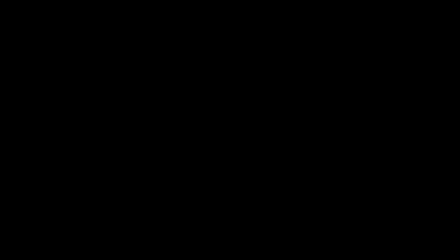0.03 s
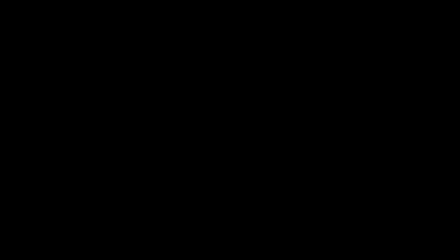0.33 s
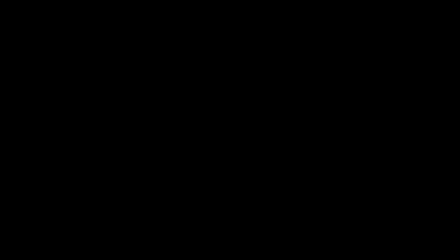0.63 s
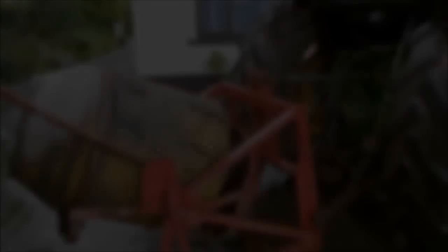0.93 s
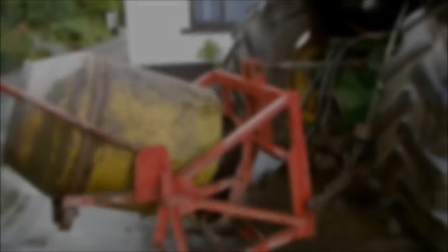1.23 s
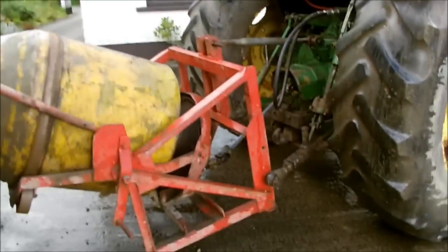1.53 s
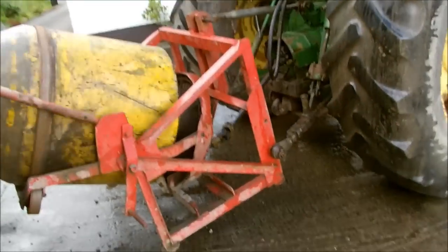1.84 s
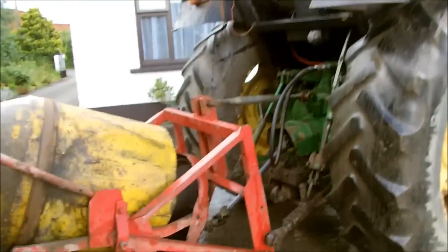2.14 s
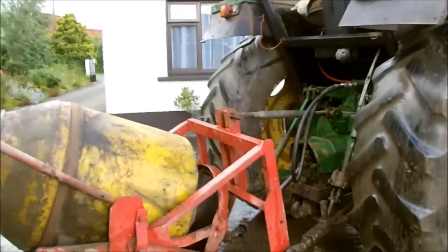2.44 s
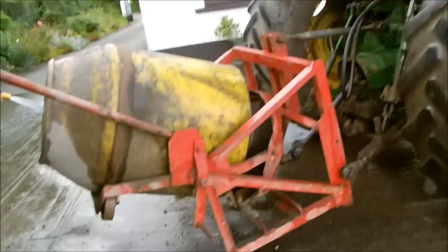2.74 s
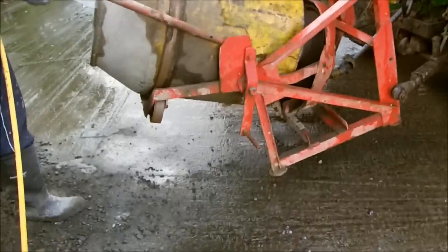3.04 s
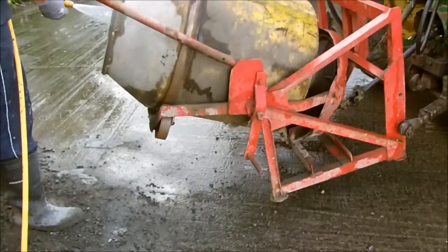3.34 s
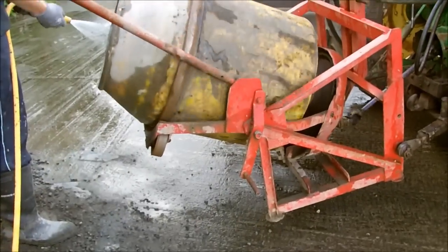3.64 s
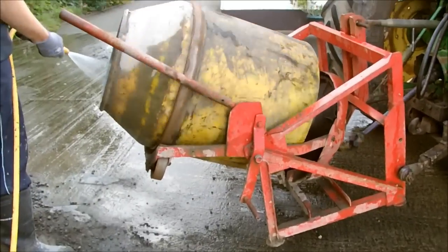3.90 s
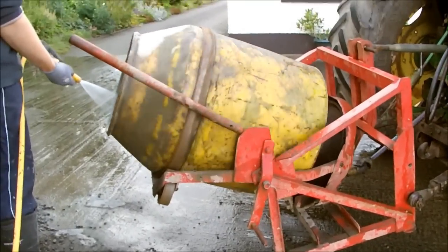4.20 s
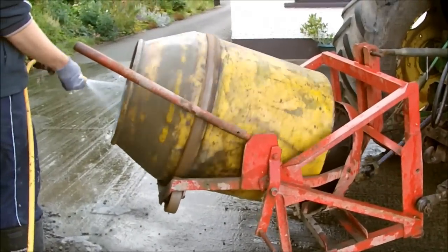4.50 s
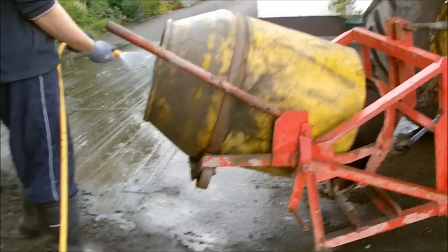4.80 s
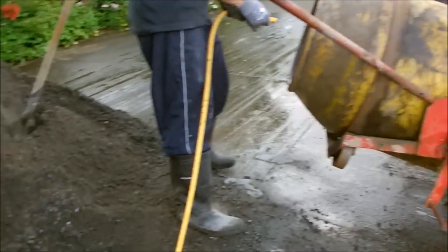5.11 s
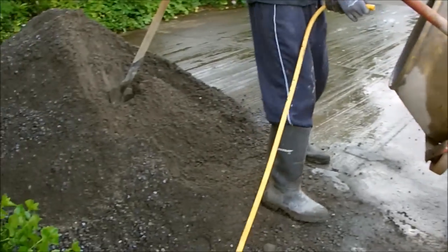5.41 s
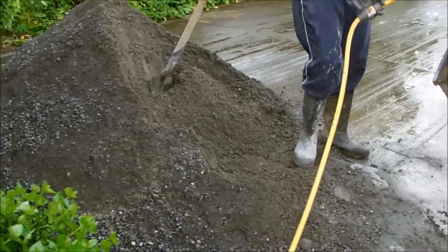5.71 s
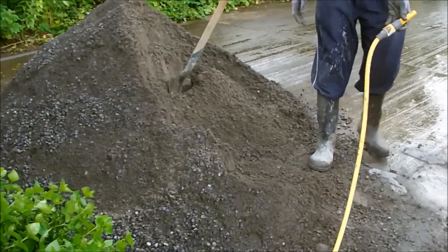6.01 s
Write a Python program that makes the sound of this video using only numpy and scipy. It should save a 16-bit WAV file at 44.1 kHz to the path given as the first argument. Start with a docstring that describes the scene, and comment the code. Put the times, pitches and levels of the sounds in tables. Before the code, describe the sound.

A tractor idles and turns a cement mixer, wet gravel tumbling amid irregular metal knocks and clangs while a hose sprays.

```python
"""A tractor idles and turns a cement mixer on a concrete yard while a hose sprays into the drum.
From the start wet gravel tumbles and booms in the steel shell, the loose drive knocks and a small
part pings. From 0.5 to 3.4 s a steel fitting clangs. After 3 s the listener slowly turns away;
the knocks thin out past 3.6 s and the spray is a little louder. From 5.4 s the knocks crowd in
again and the exhaust throbs harder."""
import sys
import numpy as np
from scipy import signal
from scipy.fft import rfft, irfft
from scipy.io import wavfile
from scipy.ndimage import uniform_filter1d, map_coordinates

SR = 44100
rng = np.random.default_rng(int(sys.argv[2]) if len(sys.argv) > 2 else 0)


def dump(signal):
    """Clip the signal to [-1, 1] and save it as 16-bit WAV at the path in sys.argv[1]."""
    limited = np.clip(np.atleast_2d(signal).T, -1, 1)
    pcm = np.round(limited * 32767).astype(np.int16)
    wavfile.write(sys.argv[1], SR, pcm)


N = 271215
T = np.arange(N) / SR

# lumps of mix dropping on the shell: (time [s], level [dB])
LUMPS = [(.309, -31), (1.43, -22.5), (2.076, -18.5), (2.14, -25), (2.807, -23.5), (3.06, -25), (3.293, -21),
         (3.514, -29), (3.894, -19.5), (4.122, -24), (4.279, -26.5), (4.828, -23.5), (4.904, -21),
         (5.219, -24), (5.692, -23.5), (5.816, -26), (6.058, -20.5)]
# spectrum of sliding gravel and of engine clatter: (frequency [Hz], level [dB])
RATTLE_SPECTRUM = [(100, -50), (400, -16.5), (800, -5.5), (1150, -3.5), (1350, -2.5), (1650, -0.5),
                   (2150, -0.5), (3000, -5.5), (5000, -10.5), (8000, -15), (15000, -28)]


def undb(db):
    """Decibels to gain."""
    return 10 ** (np.asarray(db) / 20)


def unit(x):
    """Scale to rms 1."""
    return x / np.sqrt(np.mean(x ** 2))


def curve(rows):
    """Join (time [s], value) rows by straight lines."""
    return np.interp(T, *np.transpose(rows))


def fade(t, t60_s):
    """Exponential decay, 60 dB in t60_s."""
    return np.exp(-np.log(1000) * t / np.maximum(t60_s, 1e-3))


def add(track, time_s, sound):
    """Mix a sound into a track."""
    i = max(int(time_s * SR), 0)
    track[i:i + len(sound)] += sound[:N - i]


def advance(x, samples):
    """Read a signal a fractional number of samples early."""
    return map_coordinates(x, [np.arange(N) + samples], order=5)


def lowpass(x, hz):
    """Gentle zero-phase low-pass."""
    return signal.sosfiltfilt(signal.butter(2, hz, fs=SR, output="sos"), x)


def colour(x, spectrum):
    """Minimum-phase filter from (frequency [Hz], level [dB]) rows, via the cepstrum."""
    size = 8192
    hz, db = np.transpose(spectrum)
    bins_hz = np.fft.rfftfreq(size, 1 / SR)
    gain = undb(np.interp(np.log(bins_hz + 1), np.log(hz), db))
    cepstrum = irfft(np.log(gain))
    cepstrum[1:size // 2] *= 2
    cepstrum[size // 2 + 1:] = 0
    impulse_response = irfft(np.exp(rfft(cepstrum)))
    return signal.fftconvolve(x, impulse_response)[:len(x)]


def noise(spectrum):
    """Coloured noise, rms 1."""
    return unit(colour(rng.standard_normal(N), spectrum))


def wander(rate_hz):
    """Ramps between random values, rms 1."""
    hold = int(SR / rate_hz)
    steps = np.repeat(rng.standard_normal(N // hold + 1), hold)
    return unit(uniform_filter1d(steps, hold)[:N])


def ring(modes, mode_db=0, scatter_db=3.5):
    """One blow on a set of modes; each contact point excites them differently."""
    hz, db, t60_s = np.transpose(modes)[:, :, None]
    t = T[:SR // 4]
    gain = undb(db + np.reshape(mode_db, (-1, 1)) + scatter_db * rng.standard_normal(hz.shape))
    phase = 2 * np.pi * (hz * t + rng.random(hz.shape))
    return np.sum(gain * fade(t, t60_s) * np.sin(phase), axis=0)


def grains(rate_hz, spread_db, t60_s):
    """Many small unequal impacts, each a noise burst; rms 1."""
    hits = rng.random(N) < rate_hz / SR
    sizes = undb(spread_db * np.minimum(rng.exponential(size=N), 4))
    power = signal.lfilter([1], [1, -fade(2 / SR, t60_s)], hits * sizes ** 2)
    return unit(np.sqrt(power) * rng.standard_normal(N))


def swell(peak_s, build_s, db, fall_ratio=0.8):
    """Power that grows exponentially to a peak and falls away."""
    distance = np.maximum(peak_s - T, (T - peak_s) / fall_ratio) / build_s
    return undb(db) ** 2 * np.exp(-2 * np.minimum(distance, 20))


def random_hits(count, mean_db, spread_db):
    """Random (time [s], level [dB]) rows."""
    return [(when * T[-1], mean_db + spread_db * (2 * size - 1))
            for when, size in rng.random((count, 2))]


def engine(firing_hz=46.64, unevenness=0.88, hum_db=-64, clatter_db=-44):
    """Idling diesel: unequal firings ring the exhaust, and each sets off a short clatter."""
    # exhaust response: (frequency [Hz], level [dB])
    exhaust_spectrum = [(25, -31), (47, -13), (62, 0.5), (78, -0.5), (88, 4), (104, -9), (140, -10),
                        (170, -2.5), (250, -7), (500, -33), (1500, -50)]
    # exhaust throb at the listener: (time [s], level [dB])
    throb = [(0, -52), (1.1, -55.5), (3.1, -55.5), (4.0, -57.5), (5.35, -54.5), (5.65, -51.5),
             (6.15, -51.5)]
    cycle = np.cumsum(firing_hz * (1 + 0.0033 * wander(2))) / SR
    firings = np.diff(np.floor(cycle), prepend=0) * rng.normal(0.61, unevenness, N)
    exhaust = undb(curve(throb)) * unit(colour(firings, exhaust_spectrum))
    hum = undb(hum_db) * np.sin(2 * np.pi * cycle)
    since_firing_s = cycle % 1 / firing_hz
    clatter = unit(fade(since_firing_s, t60_s=0.031) * noise(RATTLE_SPECTRUM))
    return exhaust + hum + undb(clatter_db) * clatter


def hose(gain_db=0.5, flutter_db=0.62):
    """Droplets hit the drum and the wet ground."""
    # spray as the aim shifts: (time [s], level [dB])
    spray_levels = [(.1, -34.5), (.8, -36), (1.1, -34), (1.52, -40), (1.68, -33), (2.55, -33.5),
                    (2.85, -31.5), (3.55, -31), (3.95, -33), (4.35, -30), (5.0, -31), (5.55, -32),
                    (6.15, -31.7)]
    # droplet impacts: (frequency [Hz], level [dB])
    spray_spectrum = [(150, -51), (800, -7), (2500, -1), (4500, -0.5), (7000, -3.5), (10000, -1),
                      (12500, -1), (15500, -11)]
    drops = grains(rate_hz=3000, spread_db=2, t60_s=0.006)
    level_db = curve(spray_levels) + gain_db + flutter_db * wander(18)
    return undb(level_db) * unit(colour(drops, spray_spectrum))


def small_part(gain_db=-2):
    """A small loose part pings in two high modes, with faint random pings among the loud ones."""
    # loud pings: (time [s], level [dB])
    pings = [(.2768, -26), (.3431, -23.5), (.4813, -23), (.5881, -19.5), (.6888, -24), (.7986, -25),
             (.8724, -27), (.9495, -24), (1.0565, -29), (1.6287, -19), (1.731, -27), (1.9345, -21.5),
             (2.3226, -22), (2.6414, -22.5), (2.7302, -19.5), (2.8354, -22), (2.9407, -24), (3.0395, -20.5),
             (3.1428, -22), (3.2326, -23), (3.3802, -23), (3.4675, -22), (3.5558, -27), (3.628, -25.5),
             (4.0811, -28), (4.4757, -25), (4.8574, -22), (4.9576, -27), (5.1612, -25.5)]
    # modes of the part: (frequency [Hz], level [dB], t60 [s])
    modes = [(8647, 0, .21), (11376, -11, .3)]
    out = np.zeros(N)
    for time_s, db in pings + random_hits(26, mean_db=-33, spread_db=3):
        add(out, time_s, undb(db + gain_db) * ring(modes, scatter_db=0.5))
    return out


def fitting(gain_db=4.5, pivot_hz=3600, middle_boost_db=4):
    """A steel fitting clangs, each contact with its own loudness and brightness."""
    # contacts: (time [s], level [dB], tilt [dB/octave])
    clangs = [(.5348, -31, -3), (.9837, -30, 0.5), (1.6756, -27, 2.5), (1.8874, -25.5, -7),
              (2.4349, -21.5, 1), (2.8347, -29.5, -1), (3.0545, -33, -2), (3.1914, -29.5, -2.5),
              (3.3454, -31, -1.5)]
    # modes of the fitting: (frequency [Hz], level [dB], t60 [s])
    modes = [(1880, -6, .22), (2170, 0, .12), (2540, -8, .13), (3392, -1, .11), (4140, -6, .08),
             (4865, -7, .1), (6465, 1, .11), (8774, -5, .09), (9863, 0, .1), (11068, -13, .16),
             (11242, -10, .24), (11495, -11, .24), (11874, -6, .2), (12376, -13, .2)]
    out = np.zeros(N)
    octaves = np.log2(np.clip(np.array(modes)[:, 0], 2200, 6400) / pivot_hz)
    middle_db = middle_boost_db * np.maximum(1 - 2 * np.abs(octaves), 0)
    for time_s, db, tilt in clangs:
        clang = ring(modes, db + middle_db + tilt * octaves, scatter_db=1.5)
        add(out, time_s, undb(gain_db) * clang)
    return out


def drive_knocks(base_t60_s=0.078, t60_halving_db=42, chatter_db=1.5):
    """Slack in the drive closes: a crack, then the frame rattles. Harder is brighter and shorter."""
    # loud knocks: (time [s], level [dB], hardness as treble over body [dB])
    knocks = [(.070, -24.5, 5), (0.1112, -19, 12), (0.138, -29, -9), (0.2028, -17, -1.5), (.27, -24.5, -4),
              (.336, -30, -8), (0.4263, -19, 2), (0.529, -20, -12), (.6373, -30.5, -16), (0.688, -23, -3),
              (.7996, -21, 0), (0.8487, -31, 2), (.925, -26, -1), (.9652, -19.5, 7), (.9858, -29, -9),
              (1.003, -25.5, 2), (1.127, -27.5, -1), (1.289, -29, 7), (1.3392, -34, -21),
              (1.4903, -37, -26), (1.6735, -26.5, -4), (1.719, -28, 3), (1.8463, -25, 0), (1.8891, -20, 6),
              (1.964, -28.5, -12), (1.9855, -30.5, -1), (2.2074, -17.5, 14), (2.3288, -21.5, 0),
              (2.4333, -21, 11), (2.487, -28, -8), (2.672, -29.5, -12), (2.785, -26, 1), (2.8133, -20, 8),
              (2.954, -27, -9), (3.0522, -28, -14), (3.1937, -30, -12), (3.2577, -30, -12),
              (3.3471, -23.5, 0), (3.476, -26, 3), (3.57, -25.5, -1), (4.188, -27.5, -6.5),
              (4.572, -28.5, -12.5), (4.6174, -28.5, 0), (4.902, -31, -7), (5.382, -25, 9),
              (5.4242, -28.5, -11), (5.566, -18.5, 2), (5.73, -23.5, -2), (5.7865, -24, -5),
              (5.943, -28, -9.5), (6.024, -25, -3), (6.102, -21, 0.5)]
    # low, middle and high bands of the rattle: (frequency [Hz], level [dB])
    body_spectrum = [(70, -47), (200, -32.5), (500, -2), (800, -8), (1200, -2.5), (1900, 3.5), (2700, 0),
                     (3600, -1.5), (6000, -18.5), (12000, -26)]
    edge_spectrum = [(300, -50), (1500, -6), (3500, 1.5), (5000, 5), (7000, 3.5), (8500, 1.5),
                     (11000, -8.5), (16000, -33)]
    top_spectrum = [(1500, -48), (5000, -23), (8500, -1), (10500, 4.5), (13000, 4.5), (16000, -16)]
    # modes of the tube frame: (frequency [Hz], level [dB], t60 [s])
    frame_modes = [(1140, -0.5, 0.15), (1507, 2, 0.13), (1676, -9, 0.2), (1897, 2, 0.22), (2656, 7, 0.12),
                   (3670, 4.5, 0.12), (4430, -14, 0.12), (4950, 5, 0.076), (5800, -10, 0.057)]
    soft_taps = [(time_s, db, -3.5) for time_s, db in random_hits(16, mean_db=-32, spread_db=5.5)]
    body, edge, top, frame = np.zeros((4, N))
    t = T[:SR // 4]
    attack = 1 - fade(t, t60_s=0.0091)
    crack = undb(-3) * fade(t, t60_s=0.01)
    tail = undb(-16) * fade(t, t60_s=0.33)
    for time_s, db, hardness_db in knocks + soft_taps:
        t60_s = base_t60_s * 2 ** (-hardness_db / t60_halving_db)
        low_db, high_db = db - hardness_db / 2, db + hardness_db / 2
        add(body, time_s, undb(low_db - 1.1) * attack * (fade(t, t60_s) + tail))
        add(edge, time_s, undb(db) * (undb(3.5) * attack * fade(t, t60_s) + crack))
        add(top, time_s, undb(high_db - 2) * fade(t, 0.59 * t60_s))
        add(frame, time_s, undb(low_db - 16) * ring(frame_modes))
    chatter = undb(chatter_db * wander(350))
    rattle = body * noise(body_spectrum) + edge * noise(edge_spectrum) + top * noise(top_spectrum)
    return frame + chatter * rattle


def drive(tremble_db=2.2):
    """The drive knocks; the steel parts tremble against their seats as they ring."""
    knocks = drive_knocks()
    steel = fitting() + small_part()
    return knocks + steel * undb(tremble_db * wander(200))


def tumbling(turn_s=2.56, crest_s=0.58, roll_db=-35, trickle_db=-30, spill_delay_s=0.023):
    """Rolling and sliding levels [dB]; both swing slightly with each turn of the drum."""
    # gravel slides off a paddle, gathers pace, stops: (peak time [s], build-up [s], level [dB])
    slides = [(.24, 0.067, -25.5), (.37, .03, -25), (.55, 0.051, -18.5), (.99, 0.15, -27.5),
              (1.70, 0.07, -20), (1.99, .06, -26), (2.27, 0.084, -27), (2.41, .07, -24), (2.57, .03, -25),
              (2.92, .05, -33), (3.08, 0.042, -26.5), (3.35, .06, -20.5), (3.95, .05, -28.5),
              (4.54, 0.16, -31.5), (4.89, 0.036, -25.5), (5.31, 0.053, -20.5), (5.72, 0.073, -28),
              (6.08, .035, -23)]
    turn = np.cos(2 * np.pi * (T - crest_s) / turn_s)
    slide_power = undb(trickle_db + 0.1 * turn) ** 2
    for peak_s, build_s, db in slides:
        slide_power += swell(peak_s, build_s, db)
    roll_power = undb(roll_db + 0.84 * turn + 0.44 * wander(9)) ** 2
    for time_s, db in LUMPS:  # loose mix lands just after each lump
        roll_power += swell(time_s + spill_delay_s, build_s=0.057, db=db - 12.5)
    return 10 * np.log10(roll_power), 10 * np.log10(slide_power)


def chink(hz, pitch_spread=0.0465, span_s=0.014, contacts=8):
    """A stone chatters on steel; each contact rings briefly near the same pitch."""
    out, t = np.zeros(SR // 8), T[:SR // 16]
    decay = fade(t, t60_s=0.036)
    for i, detune in enumerate(rng.standard_normal(contacts)):
        tone = np.sin(2 * np.pi * hz * (1 + pitch_spread * detune) * t) * decay
        add(out, span_s * (i + rng.random()) / contacts, tone / np.sqrt(contacts))
    return out


def stones(slide_db, loud_gain_db=5, small_count=110):
    """Stones strike the drum: a few loud ones, and many whose level follows the sliding gravel."""
    # loudest stones: (time [s], pitch [Hz], level [dB])
    loud_stones = [(.138, 2900, -21.5), (.256, 2180, -21.5), (.464, 2440, -23), (.516, 1740, -21),
                   (.563, 2120, -20), (.847, 2570, -19), (.900, 2180, -19), (.922, 1890, -18),
                   (1.008, 2700, -20), (1.339, 3250, -20), (1.449, 3580, -28), (1.652, 3380, -26),
                   (1.963, 2140, -21), (2.166, 3060, -26), (2.268, 3250, -22.5), (2.284, 1920, -22),
                   (3.314, 2100, -23), (3.348, 2400, -17), (4.880, 2010, -25), (5.286, 1910, -25),
                   (5.382, 2580, -21.5), (6.103, 2370, -18)]
    out = np.zeros(N)
    for time_s, hz, db in loud_stones:
        add(out, time_s, undb(db + loud_gain_db) * chink(hz))
    for when, smallness, force in rng.random((small_count, 3)):
        i = int(when * N)
        db = slide_db[i] - 4 + 8 * force - 7 * smallness
        add(out, T[i], undb(db) * chink(hz=1400 * 4 ** smallness))
    return out


def drum(roll_db, slide_db, lump_gain_db=-11.5):
    """Wet gravel rolls on the shell and slides down it; heavier lumps make the shell boom."""
    # load rolling on the shell: (frequency [Hz], level [dB])
    rumble_spectrum = [(40, -67), (125, -27.5), (170, -17.5), (260, -10), (330, -4.5), (430, -2),
                       (490, -6.5), (605, 2), (700, -4), (790, -18), (1000, -9), (1500, -30), (4000, -53)]
    # modes of the shell: (frequency [Hz], level [dB], t60 [s])
    shell_modes = [(331.4, -2, 0.14), (378.5, 7.5, 0.14), (416, 3, 0.24), (443.2, 8.5, 0.14),
                   (527, -10, 0.1), (603, -2, 0.17)]
    rumble = unit(colour(grains(rate_hz=620, spread_db=0.5, t60_s=0.058), rumble_spectrum))
    slide = unit(colour(grains(rate_hz=1400, spread_db=2, t60_s=0.063), RATTLE_SPECTRUM))
    soft_attack = 1 - fade(T[:SR // 4], t60_s=0.039)
    booms = np.zeros(N)
    for time_s, db in LUMPS:
        add(booms, time_s, undb(db + lump_gain_db) * soft_attack * ring(shell_modes))
    return undb(roll_db + 1) * rumble + undb(slide_db - 2) * slide + booms


def sources():
    """Three mono groups: tractor and drum, hose, drive."""
    roll_db, slide_db = tumbling()
    tractor_and_drum = engine() + drum(roll_db, slide_db) + stones(slide_db)
    return np.array([tractor_and_drum, hose(), drive()])


def scene(hose_pan_db=1, drive_pan_db=-1, boom_pan_db=-1.5, bend_hz=3000, bend_ratio=2.15):
    """Drum ahead, hose to the left, drive and low boom slightly right; positive pan is left."""
    # scatter from ground and wall, side over mid: (frequency [Hz], level [dB])
    scatter_spectrum = [(100, -29), (300, -32), (600, -16.5), (1200, -19), (2200, -19.5), (4000, -11),
                        (8000, -4.5), (13000, -2)]
    # the listener turns away from the mixer: (time [s], left-ear lead [samples])
    left_lead = [(0, 0), (3.0, 0), (4.9, 0.62), (5.4, 1.26), (6.15, 1.14)]
    groups = sources()
    mid = groups.sum(axis=0)
    # fresh noise in the scatter makes the treble differ between the ears
    side = colour(undb([0, 0, -1]) @ sources(), scatter_spectrum)
    side += (undb([0, hose_pan_db / 2, drive_pan_db / 2]) - 1) @ groups
    side += (undb(boom_pan_db / 2) - 1) * lowpass(mid, hz=900)
    # long waves bend round the listener and reach the far ear later than short ones
    lows = lowpass(mid, bend_hz)
    highs = mid - lows
    shift = curve(left_lead) / 2
    return np.array([advance(lows, ear * shift * bend_ratio) + advance(highs, ear * shift) + ear * side
                     for ear in (1, -1)])


def record(dry, start_s=0.068, top_hz=15400):
    """Near silence until start_s; peaks are rounded and the highest treble is cut."""
    gate = np.clip((T - start_s) / 0.002, undb(-62), 1)
    treble_cut = signal.ellip(8, 0.2, 70, top_hz, fs=SR, output="sos")
    return signal.sosfilt(treble_cut, np.tanh(dry) * gate)


dry = scene()
out = record(dry)
dump(out)
```